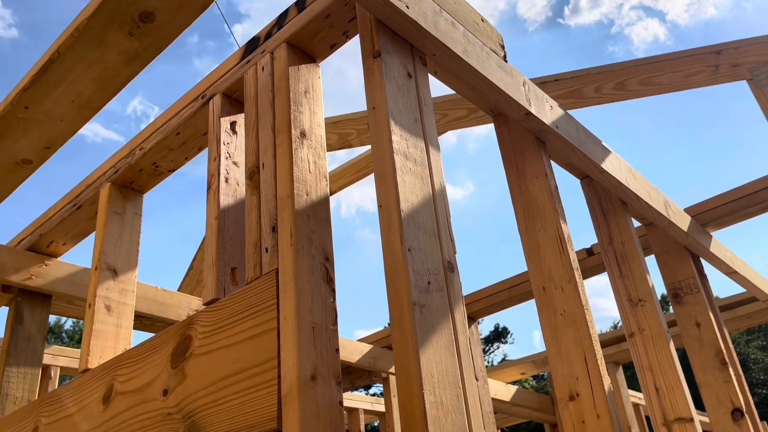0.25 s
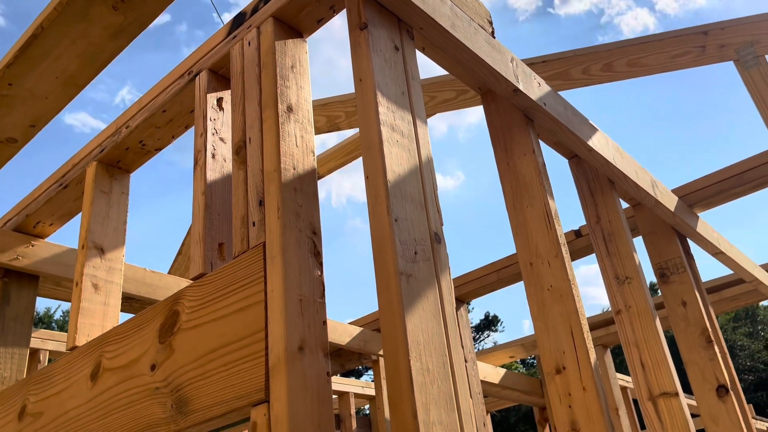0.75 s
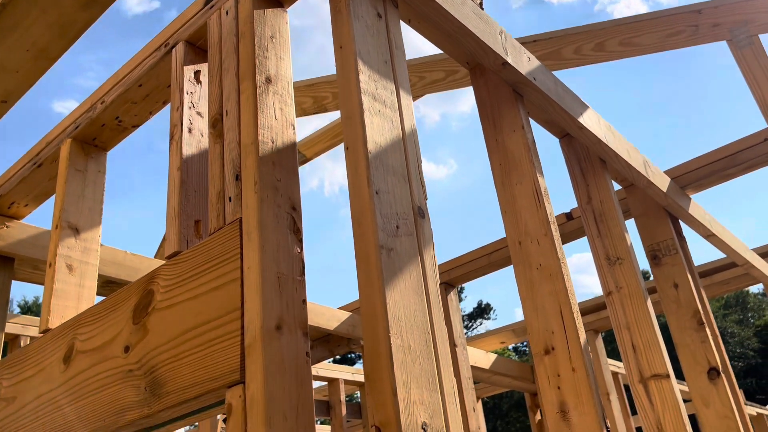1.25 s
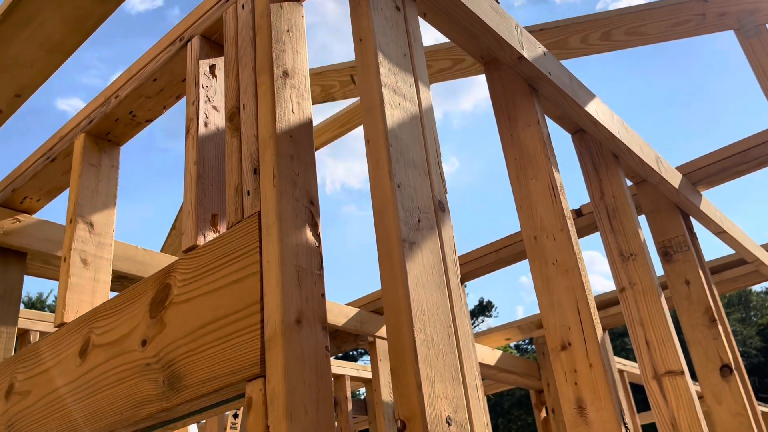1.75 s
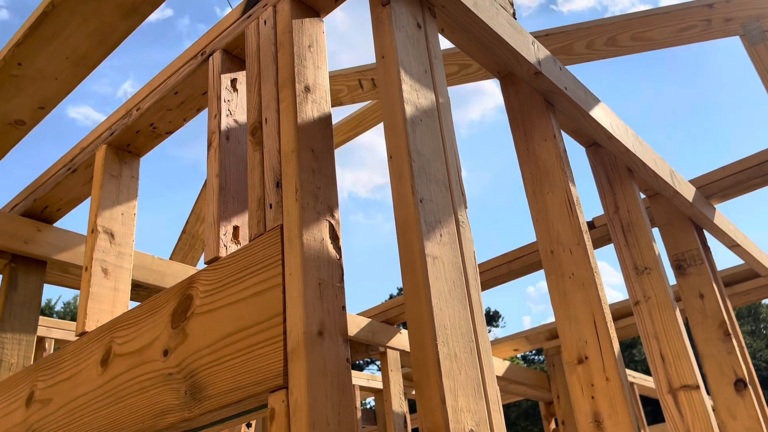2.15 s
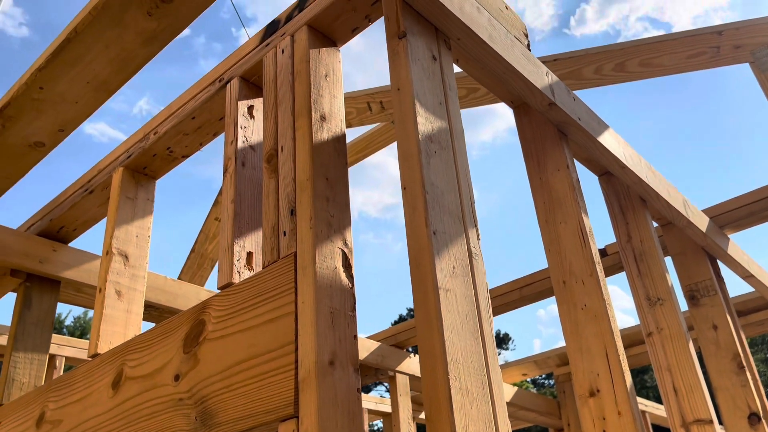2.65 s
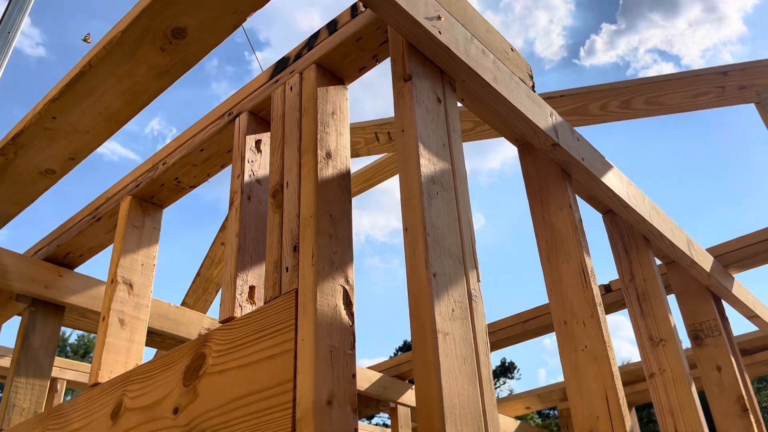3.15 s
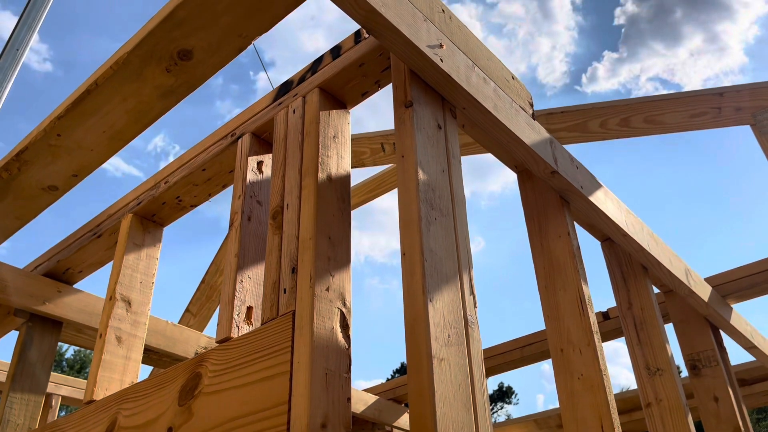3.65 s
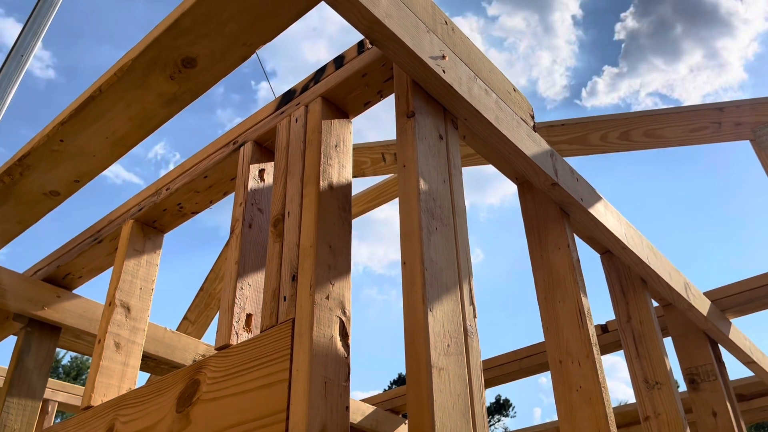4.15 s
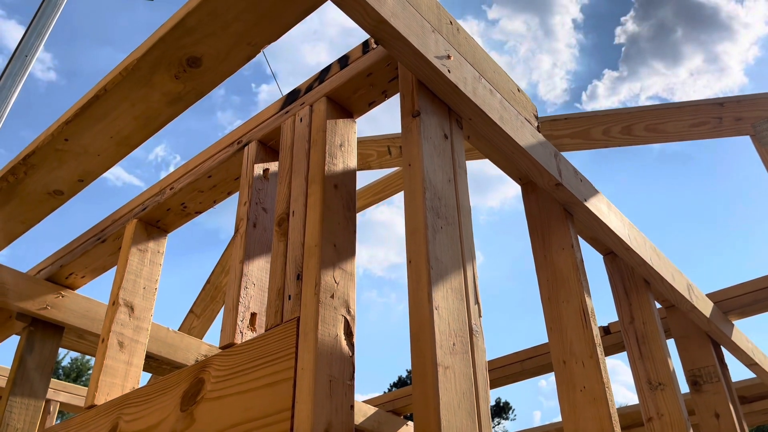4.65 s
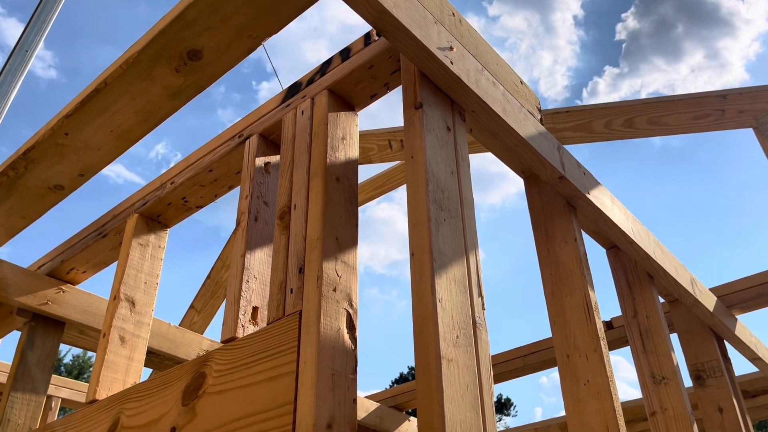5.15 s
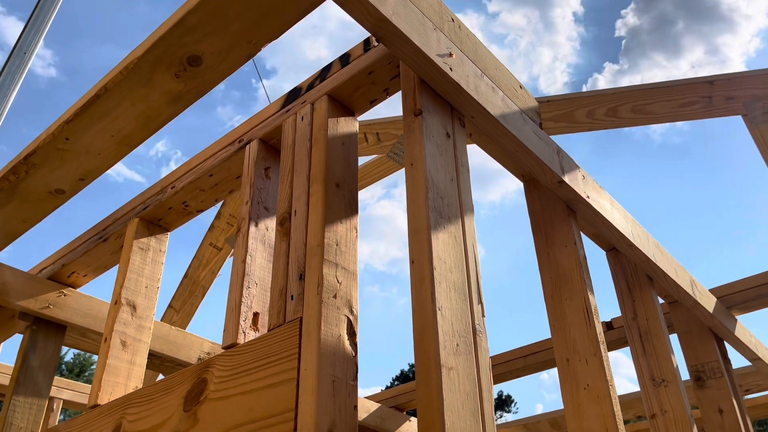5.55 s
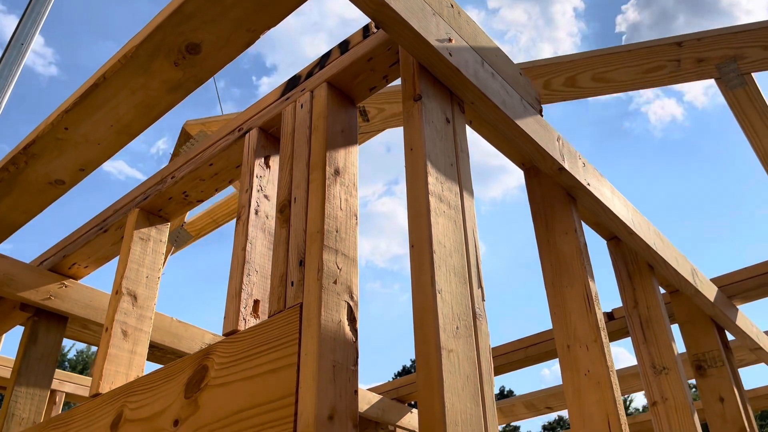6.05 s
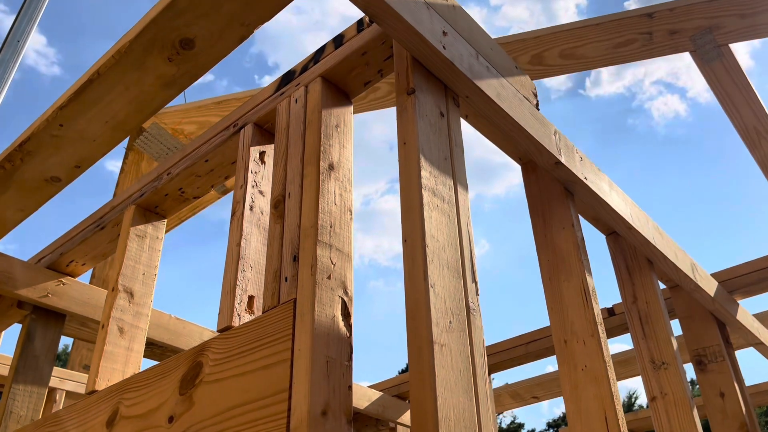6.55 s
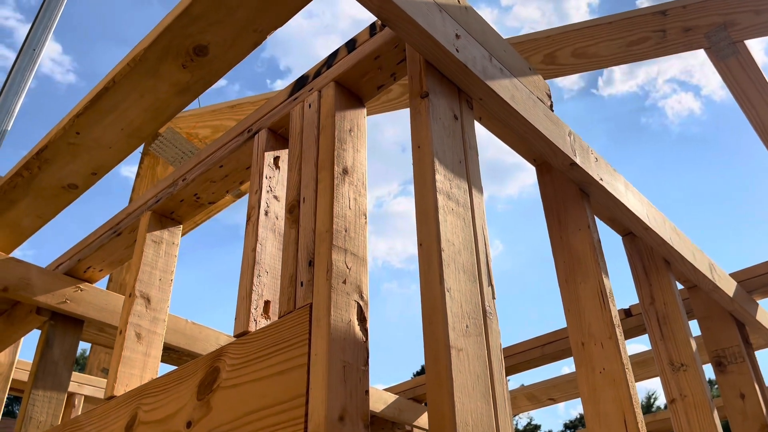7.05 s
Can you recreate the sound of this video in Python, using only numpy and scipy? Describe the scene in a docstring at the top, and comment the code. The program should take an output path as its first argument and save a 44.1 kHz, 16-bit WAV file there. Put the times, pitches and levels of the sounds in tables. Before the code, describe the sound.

An electric winch works in short runs outdoors, over a faint low hum and light wind. A quieter run is already going and winds down by 0.3 seconds. Louder runs follow at about 1.5 to 2.4, 3.1 to 3.8, 4.3 to 4.9 and 5.3 to 5.6 seconds. Each rises quickly to a grinding gear whine, then falls in pitch and rattles to a stop, leaving a soft steel ring. Very brief metal squeals come near 1.6, 3.2, 3.5 and 5.5 seconds. A sharp tick lands at 3.8 seconds, and timber knocks softly around 5, 5.8 and 6.3 seconds. From about 5.3 to 6.8 seconds a gust rumbles on the microphone with a light rustle, and one small bright snap comes at 6.3. The last run starts at 7 seconds with several high squeaks and is still going at the end, near 7.4 seconds.

```python
"""An electric winch raises a timber wall in six short runs on an open building site.
The first run is already under way over a low hum and light wind: gear teeth whine, grind and rattle
to a stop, and the steel rings on. Four more runs spin up fast with brief squeals of metal; small ticks
and soft knocks of settling timber fall between them. Then a gust buffets the microphone and rustles,
the load settles with one bright snap, and the last run starts."""
import sys
import numpy as np
from scipy import signal
from scipy.fft import rfft, irfft, next_fast_len
from scipy.io import wavfile

SR = 44100
rng = np.random.default_rng(int(sys.argv[2]) if len(sys.argv) > 2 else 0)


def pcm_store(signal):
    """Save signal as 16-bit PCM."""
    levels = np.round(np.clip(np.atleast_2d(signal), -1, 1) * 32767)
    wavfile.write(sys.argv[1], SR, levels.astype(np.int16).T)


N = 321930
T = np.arange(N) / SR
FFT_SIZE = next_fast_len(N + 4096)
BINS = np.maximum(np.fft.rfftfreq(FFT_SIZE, 1 / SR), 1)


def from_db(db):
    """Decibels to gain."""
    return 10 ** (np.asarray(db) / 20)


def rms_one(x):
    """Scale to unit rms."""
    return x / np.sqrt(np.mean(np.abs(x) ** 2) + 1e-20)


def at_hz(points, hz):
    """Read the columns of a frequency table, interpolated on a log axis."""
    freqs, *columns = np.transpose(points)
    return [np.interp(np.log(hz), np.log(freqs), column) for column in columns]


def shaped(x, gain):
    """Equalise with one gain per frequency bin."""
    return irfft(rfft(x, FFT_SIZE) * gain, FFT_SIZE)[..., :N]


def colour(points):
    """EQ curve through (Hz, dB) points, falling steeply past its ends."""
    ends = np.minimum(1, BINS / points[0][0]) * np.minimum(1, points[-1][0] / BINS)
    return from_db(at_hz(points, BINS)[0]) * ends ** 4


def noise(points):
    """Two unrelated noises (direct and scattered sound) of one colour."""
    return rms_one(shaped(rng.standard_normal((2, N)), colour(points)))


def drift(rate_hz):
    """Smooth random modulation of unit rms, drawn at a twentieth of the sample rate."""
    pole = np.exp(-40 * np.pi * rate_hz / SR)
    slow = signal.lfilter([1], [1, -2 * pole, pole * pole], rng.standard_normal(N // 20 + 3002))[3000:]
    return np.interp(np.arange(N) / 20, np.arange(len(slow)), rms_one(slow))


def resonate(x, hz, width_hz):
    """A two-pole resonance, scaled to unit rms."""
    radius = np.exp(-np.pi * width_hz / SR)
    feedback = [1, -2 * radius * np.cos(2 * np.pi * hz / SR), radius * radius]
    return rms_one(signal.lfilter([1, 0, -1], feedback, x + 1e-18))


def two_levels(x, body_db, treble_db, split_hz=2560):
    """Give the body and the treble of a sound their own levels."""
    body = shaped(x, 1 / (1 + (BINS / split_hz) ** 4))
    return from_db(body_db) * body + from_db(treble_db) * (x - body)


def swells(rows):
    """Envelope of bell-shaped swells that add in power."""
    return np.sqrt(sum((from_db(db) * np.exp(-((T - s) / half) ** 2)) ** 2 for s, db, half in rows))


def taps(rows, points):
    """Small contacts: coloured noise with a quick attack and an exponential decay."""
    envelope = np.zeros(N)
    for s, db, rise, t60 in rows:
        age = np.maximum(T - s, 0)
        decay = 1000. ** (-np.maximum(age - rise, 0) / t60)
        envelope += from_db(db) * np.minimum(age / rise, 1) * decay
    return envelope * noise(points)


def gear_motion():
    """Each run spins up, holds and coasts down under friction: the tooth rate and five level curves."""
    # winch runs: (on [s], off [s], full tooth rate [Hz], braking [Hz/s], early level [dB],
    # late level [dB], body offset [dB], whine share [dB], first harmonic [dB], second harmonic [dB])
    runs = [ (-0.6, 0.175, 445.2, 1231, -38, -26, -4.5, -3.5, -32, -34),
            (1.465, 2.228, 439.4, 1258, -22.5, -23, -6, 1, -39, -28.5),
            (3.128, 3.602, 443, 1241, -23, -25.5, -5.5, 0, -36, -29.5),
            (4.322, 4.698, 430.4, 1321, -29, -26.5, -3, -4.5, -31.5, -34),
            (5.268, 5.458, 440.8, 1330, -24, -23, -5, 2, -36.5, -32.5),
            (7.025, 7.4, 444.7, 1250, -21.5, -21, -8, -0.5, -36, -31.5), ]
    kick_hz, kick_s, spin_up_s = 134.2, .022, .047  # the rate kicks up, then closes in on full speed
    start_dip_db, attack_s = 32.5, 0.023
    bite_db, bite_s = 17.5, 0.062  # the whine comes in as the teeth bed in
    coast_loss_db, coast_power = 73.5, 2.143  # coasting gears fade ever faster
    unload_db_per_s, slow_body_db = 256.5, 24  # the whine lets go at once; slow gears sound duller
    curves = np.zeros((6, N))
    for on, off, top_hz, braking, early_db, late_db, body_db, whine_db, first_db, second_db in runs:
        now = T >= on
        driven_s = np.minimum(T[now], off) - on
        coast_s = np.maximum(T[now] - off, 0)
        speed_lost = np.minimum(braking * coast_s / top_hz, 1)
        hz = (top_hz - (top_hz - kick_hz) * np.exp(-driven_s / spin_up_s)) * (1 - speed_lost)
        held_db = early_db + (late_db - early_db) * driven_s / (off - on)
        attack_db = start_dip_db * np.exp(-driven_s / attack_s)
        curves[0, now] = hz * np.minimum(driven_s / kick_s, 1)
        curves[1, now] = held_db - attack_db - coast_loss_db * speed_lost ** coast_power
        curves[2, now] = body_db + slow_body_db * (1 - hz / top_hz) ** 2
        curves[3, now] = whine_db - bite_db * np.exp(-driven_s / bite_s) - unload_db_per_s * coast_s
        curves[4, now], curves[5, now] = first_db, second_db
    return curves


def winch(loaded_hz=418, stall_hz=60.1, wobble_hz=1.8, mesh_depth=0.14, shake_db=0.87):
    """Gears whine when driven at speed and rattle when slack; sliding teeth grind throughout."""
    # gearbox colour: (frequency [Hz], level [dB])
    gearbox = [(100, -24), (165, -5), (255, -6.5), (420, 2), (600, 3), (830, 2.5), (1500, 7.5), (2800, 1.5),
               (4400, -2), (6300, -5), (8500, 2), (10400, 1.5), (11400, -12), (12800, -38)]
    tooth_hz, level_db, body_db, whine_db, first_db, second_db = gear_motion()
    mesh_phase = 2 * np.pi * np.cumsum(tooth_hz + wobble_hz * drift(24.53)) / SR
    speed = np.clip(tooth_hz / loaded_hz, 0, 1)
    whine_gain, grind_gain = speed ** 1.9 * from_db(whine_db + 1.5), from_db(-1)
    whining = whine_gain * rms_one(shaped(whine(mesh_phase), colour(gearbox)))
    grinding = grind_gain * noise(gearbox) * (1 + mesh_depth * np.cos(mesh_phase))
    rattling = rattle() * from_db(-6 - 3 * speed ** 2)
    blend = (whining + grinding + rattling) / np.hypot(whine_gain, grind_gain)
    running = np.clip(tooth_hz / stall_hz, 0, 1) * from_db(shake_db * drift(23))
    gears = running * two_levels(blend, level_db + body_db + 5.5, level_db + 3.5)
    return gears + low_tones(mesh_phase, tooth_hz, speed, first_db, second_db) + squeals(tooth_hz)


def whine(mesh_phase, rough=0.59, rough_per_order=0.024, flutter_hz=52):
    """Tooth harmonics; uneven teeth spread sidebands round each, more so on the high ones."""
    # tooth harmonics at full speed: (multiple of the tooth rate, level [dB])
    teeth = [(1, -4), (2, -4), (3, -1.5), (4, 3.5), (5, -1.5), (6, 1), (7, 0.5), (10, -1.5), (13, 1),
             (15, 1.5), (17, 0.5), (20, 0), (26, 3.5)]
    out, orders = np.zeros((2, N)), np.arange(1, 28)
    flutter = np.array([drift(flutter_hz) for _ in range(4)])
    for order, db in zip(orders, at_hz(teeth, orders)[0]):
        skirt_share = np.clip(rough + rough_per_order * order, 0, .95)
        skirt = np.sqrt(skirt_share / 2) * np.roll(flutter, rng.integers(N), axis=1)
        steady = np.sqrt(1 - skirt_share)
        phase = order * mesh_phase + rng.uniform(0, 2 * np.pi)
        cos, sin = from_db(db) * np.cos(phase), from_db(db) * np.sin(phase)
        out[0] += (steady + skirt[0]) * cos + skirt[1] * sin
        out[1] += (steady + skirt[2]) * sin + skirt[3] * cos
    return rms_one(out)


def rattle(blows_per_s=450, spread_db=1.5):
    """Loose teeth strike the housing at random; each blow rings every resonance differently."""
    # short resonances of the housing: (frequency [Hz], width [Hz], level [dB])
    housing = [(443, 86, -6), (646, 140, -8.5), (787, 38, -3.5), (1010, 27, -2.5), (1223, 140, 1.5),
               (1926, 50, -1.5), (2516, 110, -15), (2820, 130, 2.5), (4100, 250, -25.5)]
    hits = np.flatnonzero(rng.random(N) < blows_per_s / SR)
    force = from_db(spread_db * np.clip(rng.standard_normal(N), -2, 2))
    out = np.zeros((2, N))
    for hz, width_hz, db in housing:
        clicks = np.zeros((2, N))
        clicks[:, hits] = force[hits] * rng.standard_normal((2, len(hits)))
        out += from_db(db) * resonate(clicks, hz, width_hz)
    return rms_one(out)


def low_tones(mesh_phase, tooth_hz, speed, first_db, second_db):
    """The two lowest tooth harmonics grow with speed; the second booms through a housing resonance."""
    boom_hz, boom_width_hz, boom_db = 793.6, 18, -33.5
    rough, flutter_hz, swell_db, swell_hz = 0.56, 35.2, 2.5, 15
    boom = from_db(boom_db) * np.exp(-((2 * tooth_hz - boom_hz) / boom_width_hz) ** 2)
    grip = speed ** 5.2
    # uneven teeth keep the same resonance growling
    growl = resonate(rng.standard_normal((2, N)), boom_hz, width_hz=40)
    out = grip * from_db(second_db - 9.5) * growl
    for order, gain in (1, grip * from_db(first_db)), (2, grip * from_db(second_db - 2) + boom):
        flutter = np.array([drift(flutter_hz) + 1j * drift(flutter_hz) for _ in range(2)])
        phasor = rms_one(np.array([[1], [.6j]]) + rough * flutter)
        tone = np.real(phasor * np.exp(1j * order * mesh_phase))
        out += gain * from_db(swell_db * drift(swell_hz)) * tone
    return out


def hum(gain_db=1, octave_db=-16.5, waver_db=2, swell_s=0.14, t60=1.31):
    """A wavering low tone with a weak octave: each swell rises, dips once, holds and dies away."""
    # swells of low hum: (start [s], fade from [s], first pitch [Hz], last pitch [Hz], level [dB])
    hums = [(-.6, .28, 85, 84.6, -34), (1.561, 2.297, 76, 82.6, -44), (3.22, 3.842, 77, 84.7, -40),
            (4.456, 4.884, 78, 78.3, -39.5), (5.252, 5.73, 78, 85.1, -42), (6.052, 6.855, 90, 90.2, -47),
            (7.12, 7.3, 76, 76.8, -43)]
    dip_after_s, dip_half_s, dip_depth_db = .3, .035, 11.5
    out = np.zeros(N, complex)
    for start, end, first_hz, last_hz, db in hums:
        phase = 2 * np.pi * np.cumsum(np.interp(T, [start, end], [first_hz, last_hz])) / SR
        dip_db = dip_depth_db * np.exp(-((T - start - dip_after_s) / dip_half_s) ** 2)
        fade_db = 60 * np.maximum(T - end, 0) / t60
        envelope = np.clip((T - start) / swell_s, 0, 1) * from_db(db - dip_db - fade_db)
        out += envelope * (np.exp(1j * phase) + from_db(octave_db) * np.exp(2j * phase))
    return from_db(gain_db + waver_db * drift(3.9)) * np.array([out.real, out.imag])


def still_air(level_db=-66):
    """A steady, faint bed of open air."""
    # colour of the air: (frequency [Hz], level [dB])
    air_colour = [(59, -38), (100, -5), (712, -20.5), (1130, -23.5), (1220, -21), (1750, -19.5),
                  (2020, -16), (2950, -38), (4500, -20.5), (7270, -37), (8890, -22), (12000, -50),
                  (15600, -92.5), (22000, -120)]
    return from_db(level_db) * noise(air_colour)


def wind(gain_db=3.5, calm_db=-65):
    """Gusts buffet the microphone; a faint rumble stays between them."""
    # gusts: (time [s], level [dB], half length [s])
    gusts = [(.42, -50, 0.22), (1.7, -52.5, 0.14), (2.19, -44.5, 0.12), (2.52, -49, 0.23),
             (3.25, -57.5, 0.43), (3.82, -47.5, 0.17), (4.89, -51, 0.17), (5.3, -39, 0.07),
             (5.65, -34, 0.3), (6.1, -45.5, 0.75), (6.7, -47.5, 0.34), (7.22, -51, 0.11)]
    # colour of the rumble: (frequency [Hz], level [dB])
    wind_colour = [(18, -24), (32, -7.5), (50, 1.5), (68, 7.5), (95, -2), (125, -10.5), (160, -9),
                   (220, -18), (400, -29)]
    return from_db(gain_db) * np.hypot(swells(gusts), from_db(calm_db)) * noise(wind_colour)


def steel_ring(gain_db=1, chance_db=1.5, beat_hz=8.06, beat_depth=0.59, swell_s=0.23):
    """Lightly damped steel modes swell into each stop and ring on, beating as close pairs do."""
    # modes of the winch steel: (frequency [Hz], level [dB], t60 [s])
    modes = [(1213, -5, 2.1), (1243, -2.5, 1.043), (1887, -2.5, 1.9), (1944, -4.5, 2.2), (1950, 2, 1.1),
             (2043, -6, 2.12), (2180, -14, 0.81), (2394, -10.5, 1.914), (2500, -14.5, 1), (2540, -9, 1.5),
             (2470, -9.5, 1.4), (2640, -10.5, 0.92), (2670, -7.5, 0.76), (2770, -10, 1.1),
             (3990, -2.5, 0.51)]
    # stops of the winch: (time [s], level [dB], most strongly struck frequency [Hz])
    stops = [(.3, -48, 2066), (2.33, -48, 1997), (3.721, -47, 2030), (4.8, -47, 1884), (5.551, -42, 2040)]
    struck_db, struck_width_hz = 4.5, 18
    out = np.zeros((2, N))
    for s, stop_db, struck_hz in stops:
        span = np.flatnonzero((T > s - swell_s) & (T < s + 1.5))
        age = T[span] - s
        swell = np.clip(1 + age / swell_s, 0, 1)
        for hz, db, t60 in modes:
            phases = rng.uniform(0, 2 * np.pi, (3, 1))
            beat = 1 + beat_depth * np.cos(2 * np.pi * beat_hz * rng.uniform(0.46, 2) * age + phases[2])
            accent_db = struck_db * np.exp(-((hz - struck_hz) / struck_width_hz) ** 2)
            blow_db = stop_db + accent_db + chance_db * rng.standard_normal()
            level_db = blow_db + db + gain_db - 60 * np.maximum(age, 0) / t60
            out[:, span] += swell * beat * from_db(level_db) * np.cos(2 * np.pi * hz * age + phases[:2])
    return out


def hiss():
    """A faint, thin band of high noise swells twice."""
    # swells of hiss: (time [s], level [dB], half length [s])
    hisses = [(.73, -64.5, 0.27), (3.12, -65.5, 0.31)]
    return swells(hisses) * resonate(rng.standard_normal((2, N)), hz=6260, width_hz=180)


def ticks():
    """Small, sharp ticks and scuffs between the runs."""
    # contacts: (time [s], level [dB], rise [s], t60 [s])
    contacts = [(.985, -60, 0.016, 0.34), (1.378, -56, 0.019, 0.82), (3.838, -35.5, 0.0046, 0.2),
                (4.243, -59.5, 0.0027, 0.11), (5.185, -51, 0.044, 1.2), (6.726, -50.5, .008, 0.37)]
    # colour of a tick: (frequency [Hz], level [dB])
    tick_colour = [(500, -5.5), (2000, -1), (4500, -8), (7000, -10.5), (9000, 0), (10500, 2),
                   (13000, -22.5)]
    return taps(contacts, tick_colour)


def squeals(tooth_hz, gain_db=3.5, rough_rad=0.18, glide=0.52):
    """Metal squeals as the mesh catches a resonance, its pitch partly following the gear speed."""
    # squeals: (time [s], pitch [Hz], level [dB], half length [s])
    catches = [(1.563, 2455, -27.5, 0.014), (3.175, 644, -24.5, 0.0057), (3.247, 2920, -26.5, 0.009),
               (3.525, 3094, -30, 0.0152), (5.456, 2606, -25, 0.018), (7.058, 2797, -31, 0.0144),
               (7.145, 7630, -24, .014), (7.186, 2585, -26.5, .015), (7.244, 7440, -27.5, .018),
               (7.271, 6660, -24, 0.012)]
    out = np.zeros((2, N))
    flutter = rough_rad * np.array([drift(90), drift(90)])
    for s, hz, db, half in catches:
        near = np.flatnonzero(np.abs(T - s) < 3 * half)
        pitch = hz * (tooth_hz[near] / np.interp(s, T, tooth_hz)) ** glide
        phase = 2 * np.pi * np.cumsum(pitch) / SR + flutter[:, near] + rng.uniform(0, 2 * np.pi, (2, 1))
        envelope = from_db(db + gain_db) * np.exp(-((T[near] - s) / half) ** 2)
        out[:, near] += envelope * np.cos(phase)
    return out


def timber_knocks():
    """The timber knocks softly as it settles."""
    # knocks: (time [s], level [dB], rise [s], t60 [s])
    knocks = [(2.76, -63, 0.011, .15), (4.04, -56.5, 0.01, 0.47), (4.142, -62, 0.0053, 0.09),
              (5.01, -48.5, 0.0072, .12), (5.8, -42, 0.014, 0.14), (6.316, -42.5, 0.029, 0.21),
              (6.882, -50.5, 0.016, 0.34)]
    # colour of the timber: (frequency [Hz], level [dB])
    knock_colour = [(200, -14), (750, -1), (1000, 0), (1380, 5), (1560, 3), (1730, -1), (2300, -7),
                    (4000, -19), (9000, -21)]
    return taps(knocks, knock_colour)


def rustle(crinkle_db=1, crinkle_hz=53):
    """The strongest gust brings a rustle: broad noise whose level flickers."""
    # swells of rustling: (time [s], level [dB], half length [s])
    rustles = [(5.75, -53, 0.59), (6.3, -56, 0.32)]
    # colour of the rustle: (frequency [Hz], level [dB])
    rustle_colour = [(150, -40), (250, -3.5), (913, -6.5), (1240, -4), (1860, -10), (2020, -16),
                     (2980, -16.5), (8540, -15.5), (12000, -19), (15600, -79.5), (22000, -120)]
    crinkle = noise(rustle_colour) * from_db(crinkle_db * drift(crinkle_hz))
    return swells(rustles) * two_levels(crinkle, body_db=4, treble_db=-2.5)


def load_snap():
    """The settling load gives one bright snap."""
    # snap: (time [s], level [dB], rise [s], t60 [s])
    snaps = [(6.286, -44.5, .001, 0.047)]
    # colour of the snap: (frequency [Hz], level [dB])
    snap_colour = [(2000, -25), (6800, -30), (7900, 12), (8800, 2), (10500, -4), (13000, -26)]
    return taps(snaps, snap_colour)


def site_echo(x, echo_db=-27.5, t60=0.82):
    """The surrounding framing scatters back a faint, short tail."""
    tail = rng.standard_normal((2, SR)) * 1000. ** (-T[:SR] / t60)
    tail /= np.sqrt(np.sum(tail ** 2, axis=1, keepdims=True))
    return from_db(echo_db) * signal.fftconvolve(x, tail, axes=1)[:, :N]


def microphones(field):
    """Direct and scattered sound are split between two channels; likeness, balance and the left channel's phase
    lead vary with pitch."""
    # stereo image: (frequency [Hz], likeness [0-1], left minus right [dB], left lead [rad])
    pair = [(120, .98, .7, 0), (400, .55, 2.5, 1.2), (850, .75, 4, .6), (1350, .5, 0, 1.9),
            (1750, .75, -1.8, 3.8), (2300, .4, 1.3, 6), (2700, .68, 3.2, 6.7), (5400, .5, 6.5, 7),
            (7100, .6, 6, 6.3), (7500, .8, 3, 7.6), (8600, .99, .4, 6.3), (9300, .96, .3, 4.7),
            (9950, 1, 0, 3.2), (10600, 1, 0, 2.7), (11400, 1, 0, 0)]
    likeness, balance_db, lead = at_hz(pair, BINS)
    likeness = np.clip(likeness, 0, 1)
    direct, scattered = shaped(field, np.sqrt([(1 + likeness) / 2, (1 - likeness) / 2]))
    left = shaped(direct + scattered, from_db(balance_db / 2) * np.exp(1j * lead))
    right = shaped(direct - scattered, from_db(-balance_db / 2))
    return np.array([left, right])


def scene():
    """The winch, the timber and the open air, mixed at the microphone pair."""
    gears = winch()
    ring = steel_ring()
    contacts = ticks() + load_snap() + timber_knocks()
    ambience = hum() + wind() + rustle() + hiss() + still_air()
    return microphones(gears + site_echo(gears) + ring + contacts + ambience)


def record(dry):
    """A steep low-pass cuts the top."""
    cutoff_hz = 13100
    return signal.sosfilt(signal.ellip(10, .2, 80, cutoff_hz, fs=SR, output="sos"), dry)


dry = scene()
out = record(dry)
pcm_store(out)
```